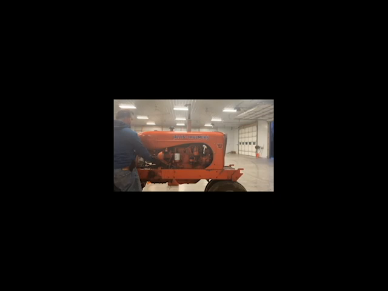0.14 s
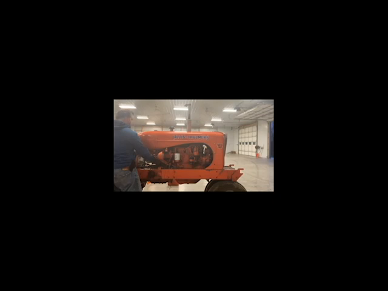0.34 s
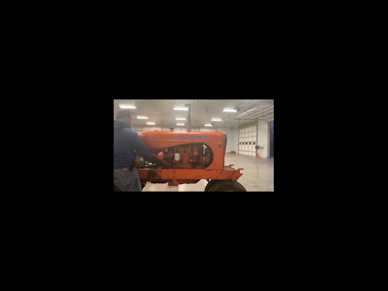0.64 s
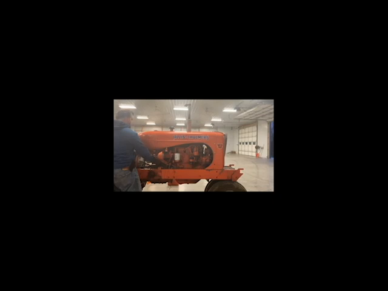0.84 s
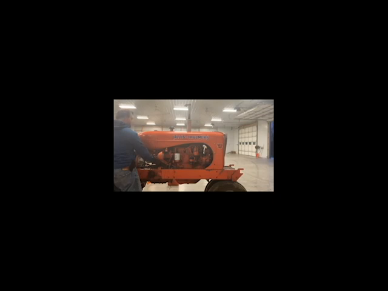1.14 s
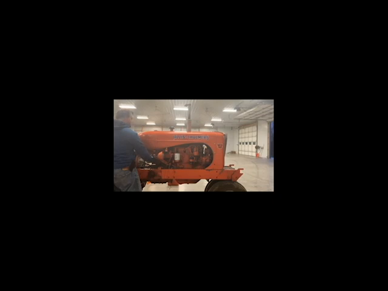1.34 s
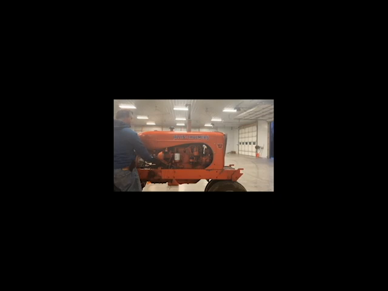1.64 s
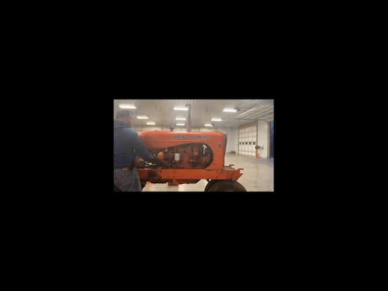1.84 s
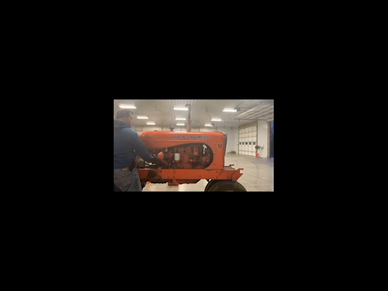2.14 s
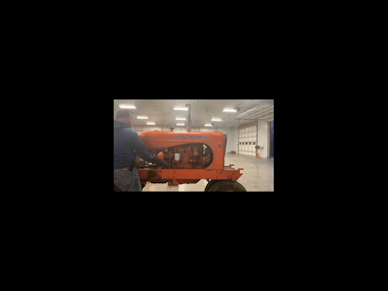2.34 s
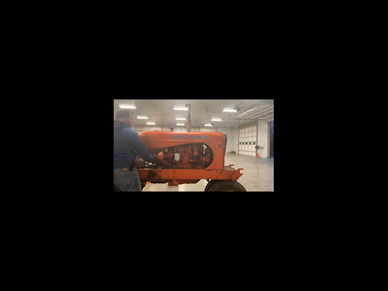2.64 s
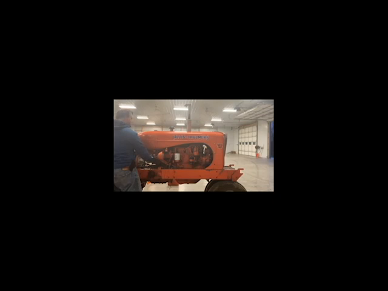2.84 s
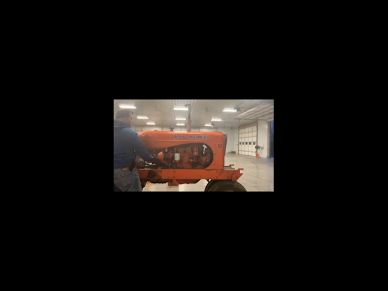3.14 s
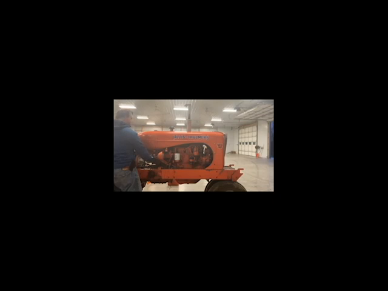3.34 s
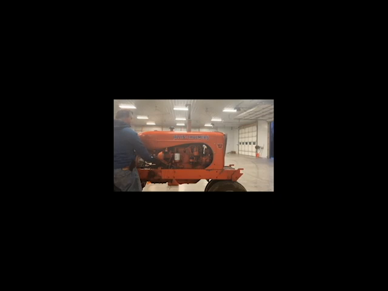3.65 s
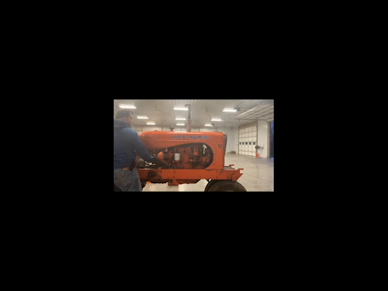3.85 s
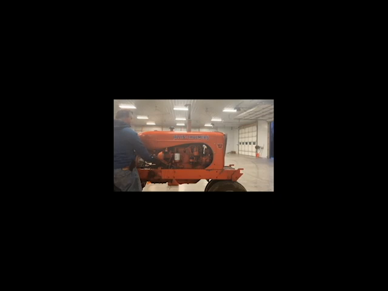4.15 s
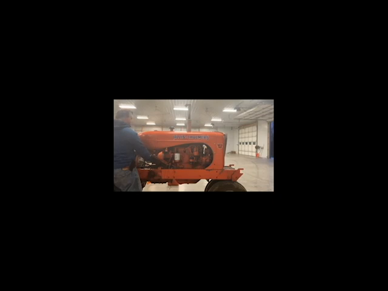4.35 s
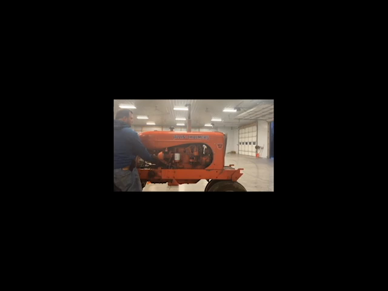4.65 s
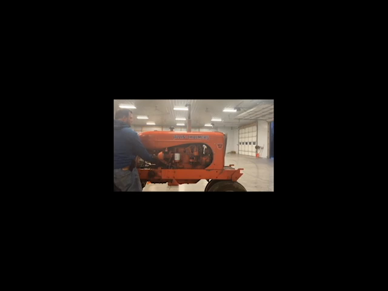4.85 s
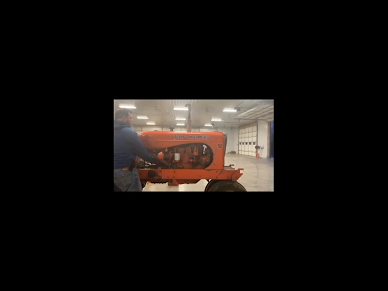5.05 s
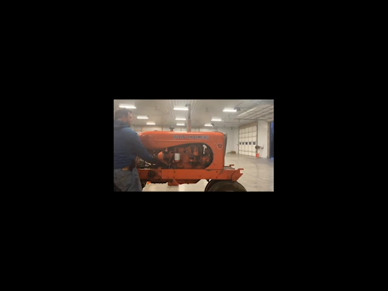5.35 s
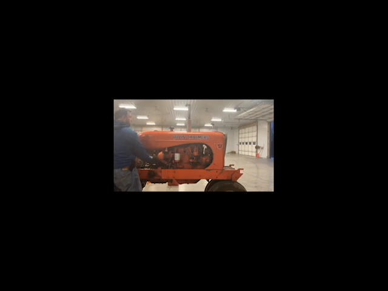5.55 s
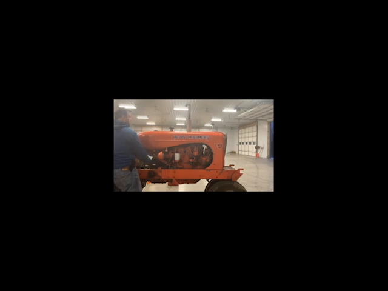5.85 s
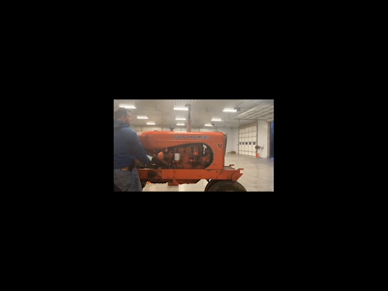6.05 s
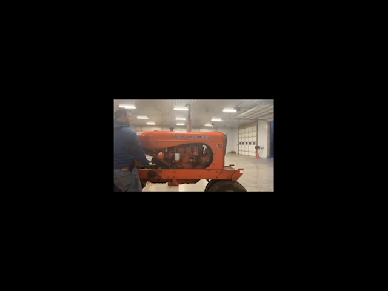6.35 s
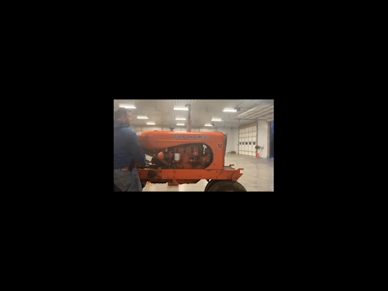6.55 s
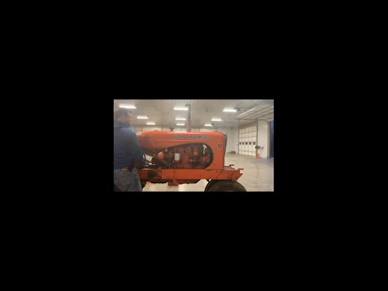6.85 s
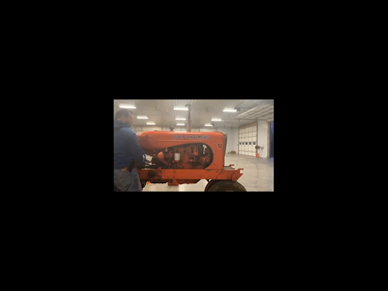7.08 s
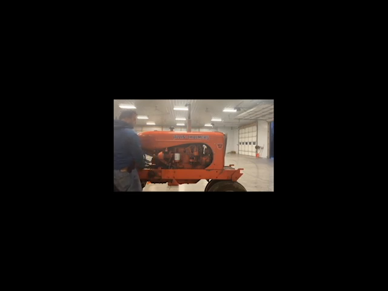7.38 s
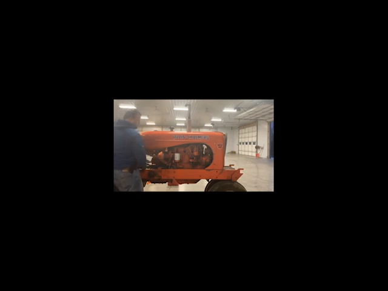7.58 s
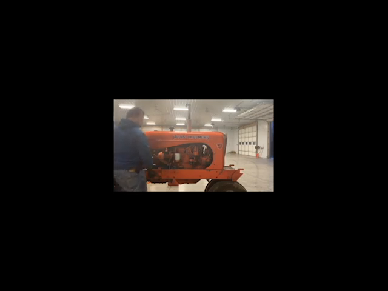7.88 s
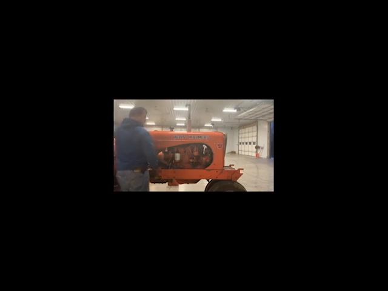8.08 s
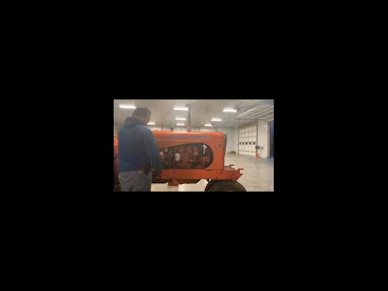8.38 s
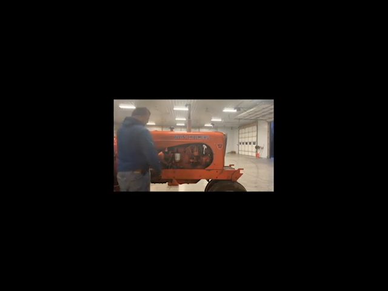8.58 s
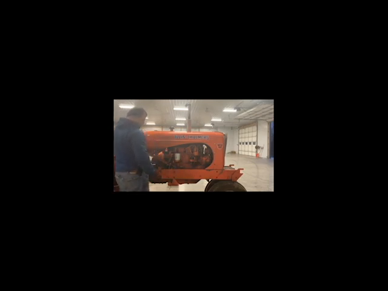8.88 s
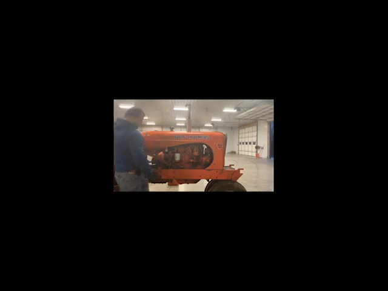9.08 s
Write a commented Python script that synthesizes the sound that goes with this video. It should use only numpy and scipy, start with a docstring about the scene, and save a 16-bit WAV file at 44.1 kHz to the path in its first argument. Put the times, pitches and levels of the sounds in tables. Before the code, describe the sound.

Faint hand knocks, a grinding, pulsing starter whine in two tries, then an old four-cylinder tractor engine fires up and settles into a spitting, clacking idle.

```python
"""Soft knocks of a hand on the controls open the scene, in the faint noise of a large workshop.
The starter of an old four-cylinder petrol tractor then clashes in and whines, a harmonic series at the
rate of tooth contact; it drags at each compression, slips out, slows and cranks again.
The engine catches, backfires and settles to a slow idle: firings excite low modes and pipe modes,
one cylinder spits bursts of noise on every cycle, and the valve gear clacks through a ringing cover."""
import sys
import numpy as np
from scipy import signal
from scipy.fft import rfft, irfft, next_fast_len
from scipy.io import wavfile

SR = 44100
rng = np.random.default_rng(int(sys.argv[2]) if len(sys.argv) > 2 else 0)


def store_wav(level_fs):
    """Save 16-bit WAV to argv[1]."""
    pcm = np.round(np.clip(np.atleast_2d(level_fs), -1, 1) * 32767)
    wavfile.write(sys.argv[1], SR, pcm.T.astype(np.int16))


N = 406602

# All levels below are relative unless they are ratios of two sounds.
# hand on the controls: (time [s], level [dB])
HANDLING = [(0.018, -38), (0.079, -46), (0.574, -45), (1.044, -46), (1.099, -35), (1.148, -30.5)]
# resonances of the control lever: (frequency [Hz], width [Hz], level [dB])
LEVER = [(950, 67, -4), (1210, 66, 3), (1300, 50, -12), (1400, 40, -7), (2150, 90, -9)]
# spectra of the tick, dull body and lever of a knock: (frequency [Hz], level [dB])
TICK_COLOUR = [(700, -20), (2000, -11), (5000, -10), (14000, -12)]
KNOCK_COLOUR = [(120, -1), (350, 4), (700, -7), (2200, -10), (4200, -13), (12000, -39.5)]
LEVER_TONE = [(1500, -2), (6000, -26)]
# steady background noise of the workshop: (frequency [Hz], level [dB])
SHOP_COLOUR = [(25, -1), (70, 2.5), (150, -8.5), (400, -14), (650, -22.5), (1400, -30), (4000, -37),
               (8000, -38), (15000, -62)]
SHOP_DB = -58.5
# workshop decay: (frequency [Hz], time to fall 60 dB [s])
HALL_DECAY = [(100, 2), (500, 1.74), (2000, 0.55), (6000, 0.48), (15000, 0.53)]
# likeness of the room sound in the two channels: (frequency [Hz], likeness [0-1])
LIKENESS = [(100, 0.9), (300, 0.96), (600, 0), (1500, 0), (4000, 0), (9000, 0.76)]
# strength of the room sound: (frequency [Hz], level [dB])
WET = [(1500, -4), (3000, -1.5), (5500, 0), (8500, -11.5)]

# starter gear speed before drag, one list per try: (time [s], speed [teeth/s])
TRIES = [
    [(1.2, 160), (1.35, 260), (1.46, 403), (1.55, 470), (1.7, 470), (1.81, 510), (1.96, 528), (2.6, 512)],
    [(2.63, 510), (2.7, 300), (2.8, 294), (2.89, 180), (3.12, 160.5), (3.25, 313), (3.38, 380), (3.49, 444),
     (3.62, 498)],
]
# load on the starter, one list per try: (time [s], gear level [dB], motor groan level [dB])
LOAD = [
    [(1.17, -34, -53), (1.206, -21.5, -15.5), (1.242, -14, -24), (1.266, -12, -8.5), (1.84, -9, -19.5),
     (2.344, -14, -15.5), (2.368, -22.5, -26), (2.49, -26.5, -25), (2.62, -33, -47)],
    [(2.65, -21, -15), (2.73, -20, -12), (3.098, -38.5, -31), (3.228, -22.5, -12.5), (3.364, -11.5, -11.5),
     (3.408, -14.5, -10.5), (3.54, -9, -22), (3.77, -10, -12.5), (3.81, -19, -21)],
]
# a piston comes up against compression and drags on the starter: (time [s], drag [0-1])
DRAGS = [(1.409, 0.32), (1.52, .25), (1.636, 0.72), (1.775, 1), (1.878, .8), (1.978, 0.48), (2.078, .9),
         (2.185, 1), (2.284, .6), (2.39, .8), (3.41, .3), (3.645, .7), (3.775, 0.68)]
# half length [s] of a drag; a full drag takes these shares of speed and clean whine, and this level
DRAG_S, DRAG_SLOWS, DRAG_QUIETS_DB, DRAG_ROUGHENS = 0.022, 0.17, 6, 0.21
# the gear only grinds when slow; when fast, up to this share of its power is clean whine
SLOW_TEETH_HZ, FAST_TEETH_HZ, CLEAN_AT_SPEED = 174, 404, 0.76
# gear load at which the teeth only skate, and at which they bear fully
SLIPPING_DB, GRIPPING_DB = -25, -15
# gear noise: (frequency [Hz], level [dB])
GEAR_COLOUR = [(200, -18), (420, -7.5), (620, -7.5), (860, -7), (1160, -1.5), (2020, -1.5), (2600, -9),
               (4000, -15), (5860, -19.5), (8320, -15.5), (11000, -21), (15700, -32)]
# resonances of the flywheel housing: (frequency [Hz], width [Hz], level [dB])
HOUSING = [(851, 30, 7), (1279, 7.1, 1), (1426, 47, -6.5), (1570, 20, -1.5), (1695, 13, 7), (1940, 14, -11),
           (2035, 46, 1), (2230, 11, -2), (2454, 18, 2)]
# resonances of the frame under the starter: (frequency [Hz], width [Hz], level [dB])
FRAME = [(163, 13.1, -2.5), (251, 24, 2), (305, 23, 6), (403, 37, 3), (455, 67, -0.5), (523, 14, 1),
         (664, 58, -6.5)]
# treble loss of the groan: (frequency [Hz], level [dB])
GROAN_TONE = [(1500, -0.5), (5000, -4), (12000, -17.5)]
# hums of the labouring starter motor: (time [s], length [s], frequency [Hz], level [dB])
HUMS = [(1.2, 0.3, 306.4, -16), (2.677, 0.037, 470, -11.5), (2.713, 0.033, 311.3, -15),
        (2.89, .17, 164.5, -21), (3.132, 0.43, 306.9, -24), (3.41, 0.0705, 309.8, -11.5)]
HUM_ATTACK_S, HUM_RELEASE_DB_PER_S = 0.013, 120
# pinion hitting the flywheel ring: (time [s], level [dB])
CLASHES = [(1.2328, 2), (2.448, -12.5), (2.6352, -3.5), (2.69, -13.5)]
# spectra of the crash and of the shudder after it: (frequency [Hz], level [dB])
CRASH_COLOUR = [(200, -7.0), (500, 8), (2000, 3.5), (3500, -7.0), (9000, -10), (15000, -16)]
SHUDDER_TONE = [(1200, 1.5), (4000, -32), (12000, -26)]
# harsh squeal after each compression: (frequency [Hz], level [dB])
SQUEAL = [(450, -1), (900, -10), (1300, -35), (1650, 4), (2050, 9), (2300, -21), (3500, -35)]
SURGE_AFTER_S, SURGE_S = 0.043, 0.035   # delay of the squeal after a compression; its half length

# cylinders puffing over compression while cranked: (time [s], level [dB])
COMPRESSIONS = [(1.528, -17), (1.778, -22), (1.979, -18), (2.18, -22), (2.38, -20), (3.55, -20),
                (3.75, -20)]
# the four cylinders: (place in the cycle [0-1], thump level [dB], puff level [dB])
CYLINDERS = [(0, 2, 4.5), (.276, 0, -17.5), (0.528, -20, -42), (.78, -2.5, -5)]
# exhaust pipe modes: (frequency [Hz], level [dB], time to fall 60 dB [s])
PIPE = [(103.2, -7, 0.45), (132, -11, 0.37), (164, -16, 0.073), (201.4, -3, 0.19), (220.5, -1, 0.092),
        (252.3, -1.5, 0.24), (301, -3.5, 0.27), (418.2, -2.5, 0.28), (523.3, -4.5, 0.45)]
# backfire: (time [s], hiss level [dB], bark level [dB], boom level [dB])
BACKFIRE = [(4.1779, 0, -5, -2)]

CATCH_S = 3.8   # the engine catches and throws the starter out of mesh
SETTLED_S = 5.68   # the valve pattern alternates from here on
# extra level at the catch and time constant of its settling
FLARE_RUMBLE_DB, FLARE_RUSTLE_DB, FLARE_S = 7, 10.5, 0.46
IDLE_RUMBLE_DB, IDLE_RUSTLE_DB = -27, -27
# spectra of the running engine: (frequency [Hz], level [dB])
RUMBLE = [(15, -36), (28, -3), (55, 3), (96, -6.5), (284, -4.5), (350, -6), (465, -3.5), (517, 0.5),
          (609, -10), (900, -32), (1170, -35), (1980, -120)]
RUSTLE = [(350, -19), (600, 1), (1700, 0), (3600, -5.5), (5500, -11), (8400, -11), (11300, -13.5),
          (15700, -24)]
# timing gear whirr: (frequency [Hz], width [Hz], level [dB])
WHIRR = [(306.7, 7.9, -8), (398, 8.5, -5.5), (493, 34, -3.5), (526.6, 7.4, 0)]
# partials of the free-spinning starter armature: (frequency [Hz], level [dB])
ARMATURE_COLOUR = [(75, -6), (160, 3), (250, 2.5), (370, -6.5), (450, 4), (510, -0.5), (570, -14),
                   (700, -19)]
# freed armature: turns per second at first and at most, rise time, time constant of the run-down
FREE_START_HZ, FREE_TOP_HZ, RACE_S, COAST_S = 65, 87, 0.28, 2.4
FREE_SWELL_S, FREE_FADE_DB_PER_S = 0.14, 14
# the loud cylinder spits at the start of each four-stroke cycle:
# (time [s], hiss level [dB], bark level [dB])
SPITS = [(3.822, 5, -12), (4.0954, 4, -12), (4.3996, 1, -15), (4.6789, 2, -15), (4.939, 0, -16.5),
         (5.1905, -2, -19), (5.438, -1, -14), (5.682, -1, -17), (5.9245, 0.5, -12.5), (6.1632, -2, -14),
         (6.4001, 2.5, -10.5), (6.6227, -1, -13), (6.8501, -1, -14.5), (7.0807, -4, -13),
         (7.3211, -4.5, -12.5), (7.5457, -1.5, -14), (7.7802, 0, -12), (8.0184, 1, -13.5), (8.2558, 1, -11),
         (8.4885, 0, -12.5), (8.7254, 1, -12.5), (8.9578, -1, -13), (9.1957, -1, -12.5)]
# spectra of the hiss, bark and low woof of a spit: (frequency [Hz], level [dB])
SPIT_COLOUR = [(1200, -47), (2000, -12), (3900, -2.5), (5200, -10), (8300, -1), (11500, -3.5), (14000, -8),
               (15700, -10)]
BARK_COLOUR = [(150, -11), (300, -12), (700, -3), (1100, -5), (1700, -3.5), (2600, -3.5), (4000, -17)]
CHUG_COLOUR = [(60, -12), (120, 2.5), (220, 3.5), (320, -7.0), (500, -12), (2000, -54)]
# valve gear clacks in every cycle:
# (place in the cycle [0-1], level [dB], extra level on every second settled cycle [dB])
VALVE_GEAR = [(.135, -18, 12.5), (.25, -19, -4), (.465, -13, 6.5), (.8, -21.5, 0.5)]
# louder stray knocks of the valve gear: (time [s], level [dB])
KNOCKS = [(4.5217, -9), (5.536, -5.5), (6.3595, -4.5), (6.803, -4), (6.975, -8), (7.2984, -4.5),
          (8.202, -9.5)]
# valve cover resonances: (frequency [Hz], width [Hz], level [dB])
COVER = [(1711, 21, -3), (2047, 27, -8.5), (2905, 86, -4.5), (3480, 98, -5), (3878, 44, -4),
         (4260, 720, -6), (7320, 57, -22), (8400, 45, -23), (8670, 60, -8.5), (9000, 70, -7)]

# lead of the right channel in the direct engine sound: (frequency [Hz], phase [rad])
ENGINE_LEAD = [(1000, 0), (3200, .9), (5000, 1), (6500, 0)]
# lag of the right channel in the whole sound: (frequency [Hz], phase [rad])
CHANNEL_PHASE = [(0, 0), (4900, 0), (6030, 2.8), (8100, 6.28), (9800, 9.42), (11400, 12.57), (13200, 15.71),
                 (14700, 18.85), (16400, 22)]
# left over right: (frequency [Hz], level difference [dB])
CHANNEL_BALANCE = [(110, 2.5), (380, 2.1), (700, 0.6), (1290, -1.2), (2380, -1.5), (4400, 0.6),
                   (8000, -0.11)]
CUTOFF_HZ = 15800


def from_db(db):
    """Amplitude ratio of a level."""
    return 10 ** (np.asarray(db) / 20)


def rms_one(x):
    """Normalises to unit effective value."""
    return x / np.sqrt(np.mean(x ** 2) + 1e-20)


def in_time(rows):
    """Linear interpolation of each column of a curve at every sample."""
    s, *columns = np.transpose(rows)
    return [np.interp(np.arange(N) / SR, s, c) for c in columns]


def at_hz(points, hz):
    """A spectrum interpolated on a log-frequency axis."""
    table_hz, value = np.array(points).T[:2]
    return np.interp(np.log(hz + 1e-9), np.log(table_hz), value)


def fade(start, end):
    """Linear ramp from 0 at start to 1 at end; falls in time if end comes first."""
    return np.clip((np.arange(N) / SR - start) / (end - start), 0, 1)


def since(start):
    """Seconds since start, 0 before it."""
    return np.maximum(np.arange(N) / SR - start, 0)


def share(x, low, high):
    """Linear ramp from 0 at low to 1 at high."""
    return np.clip((x - low) / (high - low), 0, 1)


def drift(rate):
    """Random modulation: straight lines between normal draws, rate of them per second."""
    knots = rng.standard_normal(N // 20)
    return np.interp(np.arange(N) / SR * rate, np.arange(len(knots)), knots)


def shape(x, response):
    """Linear filtering: multiplies the spectrum by a response given as a function of Hz."""
    size = next_fast_len(N + SR // 4, True)
    hz = np.arange(size // 2 + 1) * SR / size
    return irfft(rfft(x, size) * response(hz), size)[..., :N]


def equalise(x, spectrum):
    """Zero-phase filtering by a table of levels."""
    return shape(x, lambda hz: from_db(at_hz(spectrum, hz)))


def colour(x, spectrum):
    """Spectral colouring of a steady signal to unit effective value."""
    return rms_one(equalise(x, spectrum))


def noise(spectrum):
    """White noise coloured by a spectrum."""
    return colour(rng.standard_normal(N), spectrum)


def clicks(times, db):
    """Impulses of the given height, one at each time."""
    out = np.zeros(N)
    at = np.round(np.asarray(times) * SR).astype(int)
    inside = (at >= 0) & (at < N)
    out[at[inside]] = from_db(db)[inside]
    return out


def dying(x, t60):
    """Exponential decay of each click, falling 60 dB in t60 seconds."""
    return signal.lfilter([1], [1, -from_db(-60 / (t60 * SR))], x + 1e-18)


def swell(x, rise_s):
    """First-order lag that rounds the onset of an envelope."""
    r = np.exp(-1 / (rise_s * SR))
    return signal.lfilter([1 - r], [1, -r], x)


def ring(x, hz, t60):
    """Damped oscillator: a unit click sets a decaying sine of height 1 ringing."""
    r = from_db(-60 / (t60 * SR))
    w = 2 * np.pi * hz / SR
    return signal.lfilter([0, np.sin(w)], [1, -2 * r * np.cos(w), r * r], x + 1e-18)


def resonate(x, peaks):
    """Parallel resonances, each of (frequency, width, level)."""
    return sum(from_db(db) * signal.lfilter(*signal.iirpeak(hz, hz / width, fs=SR), x)
               for hz, width, db in peaks)


def partial(turn, k):
    """Harmonic k of a rotation counted in turns, with staggered phase."""
    return np.cos(2 * np.pi * k * turn + k * k)


def lagged(x, phase):
    """Interaural phase: a pair of channels in which the right lags by (frequency, radians)."""
    half = 0.5j * np.array([[1], [-1]])
    return shape(x, lambda hz: np.exp(half * np.interp(hz, *np.transpose(phase))))


def handling(level_db=-17.5, t60=0.49, tick_db=-8.0, tick_t60=0.022, lever_db=-11.0, lever_t60=0.14):
    """Impact excitation: a hand's knock gives a tick, a dull body and the resonance of the lever."""
    s, db = np.transpose(HANDLING)
    tick = noise(TICK_COLOUR) * dying(clicks(s, db + tick_db), tick_t60)
    body = noise(KNOCK_COLOUR) * dying(clicks(s, db + level_db), t60)
    lever_envelope = swell(dying(clicks(s, db + lever_db), lever_t60), 0.0079)
    lever = rms_one(resonate(rng.standard_normal(N), LEVER)) * lever_envelope
    return tick + body + equalise(lever, LEVER_TONE)


def workshop(x, build_s=0.0013):
    """Diffuse reverberation: noise tails in bands about an octave wide, longest in the bass."""
    t = np.arange(SR) / SR
    edges = np.geomspace(120, 16000, 8)
    tail = 0
    for low, high in zip(edges, edges[1:]):
        hz = np.sqrt(low * high)
        band = signal.butter(2, [low, high], "band", fs=SR, output="sos")
        mid, side = signal.sosfilt(band, rng.standard_normal((2, SR)))
        decay = from_db(-60 * t / at_hz(HALL_DECAY, hz)) * (1 - np.exp(-t / build_s))
        alike = np.clip(at_hz(LIKENESS, hz), 0, 1)
        gain = from_db(at_hz(WET, hz)) / np.sqrt(2 * np.sum(decay ** 2))
        pair = np.sqrt(1 + alike) * mid + np.sqrt(1 - alike) * side * [[1], [-1]]
        tail = tail + gain * decay * pair
    return signal.fftconvolve(x[None], tail, axes=1)[:, :N]


def bumps(delay_s, half_s):
    """Gaussian pulses, each delay_s after a compression and as high as its drag."""
    t = np.arange(N) / SR
    return sum(depth * np.exp(-0.5 * ((t - s - delay_s) / half_s) ** 2) for s, depth in DRAGS)


def cranking():
    """Compression torque slows, quiets and roughens the gear: teeth/s, pace, clean share, two levels."""
    teeth_hz, = in_time(np.vstack(TRIES))
    gear_level, groan_level = in_time(np.vstack(LOAD))
    drag = bumps(0, DRAG_S)
    pace = share(teeth_hz, SLOW_TEETH_HZ, FAST_TEETH_HZ)
    grip = share(gear_level, SLIPPING_DB, GRIPPING_DB)
    clean = np.clip(CLEAN_AT_SPEED * pace * grip * (1 - DRAG_ROUGHENS * drag), 0, 1)
    teeth_hz = teeth_hz * (1 - DRAG_SLOWS * drag)
    return teeth_hz, pace, clean, gear_level - DRAG_QUIETS_DB * drag, groan_level


def starter(wobble=0.01206, tooth_spread_db=3.5, housing_db=-4.5, gear_db=-3.5, fast_gear_db=7.5,
            groan_db=-1.0, fast_groan_db=-5.0, grind_db=4.0):
    """Gear meshing: tooth contacts give harmonics and grinding noise that excite housing and frame."""
    teeth_hz, pace, clean, gear_level, groan_level = cranking()
    turn = np.cumsum(teeth_hz * (1 + wobble * (drift(220) + drift(35)))) / SR
    series = sum(partial(turn, k) for k in range(1, 11))
    whine = rms_one(series * from_db(tooth_spread_db * drift(200)))
    tooth_beat = 1 + 0.28 * np.cos(2 * np.pi * turn)
    grind = rng.standard_normal(N) * tooth_beat * from_db(2.06 * drift(260))
    smooth = np.sqrt(clean)
    rough = np.sqrt(1 - clean) * from_db(grind_db)
    mesh = smooth * colour(whine, GEAR_COLOUR) + rough * colour(grind, GEAR_COLOUR)
    gear = rms_one(mesh + from_db(housing_db) * rms_one(resonate(mesh, HOUSING)))
    # the groan weights the whine by the clean share itself, not its root
    groan = rms_one(clean * rms_one(resonate(whine, FRAME)) + rough * rms_one(resonate(grind, FRAME)))
    groan = equalise(groan, GROAN_TONE)
    # with speed the gear gets louder and the groan fades
    gear = gear * from_db(gear_level + gear_db + fast_gear_db * pace)
    groan = groan * from_db(groan_level + groan_db + fast_groan_db * pace)
    engaged = fade(1.16, 1.19) * fade(3.88, 3.78)
    return engaged * (gear + groan)


def drone(level_db=-5.5, wobble=0.01235, waver_db=6.0, overtone_db=-25.0):
    """Frequency-modulated tones: the loaded motor's wavering hums swell, hold and die away."""
    clock = np.cumsum(1 + wobble * drift(60)) / SR
    out = 0
    for s, length, hz, db in HUMS:
        angle = 2 * np.pi * hz * clock
        hum = rms_one(np.sin(angle) + from_db(overtone_db) * np.sin(2 * angle))
        release = from_db(db - HUM_RELEASE_DB_PER_S * since(s + length))
        out = out + hum * fade(s, s + HUM_ATTACK_S) * release
    return out * from_db(level_db + waver_db * drift(24.44))


def clashes(level_db=-0.5, t60=0.11):
    """Impact and friction: the pinion slams into the ring gear, ringing the housing, then scrapes."""
    s, db = np.transpose(CLASHES)
    crash = noise(CRASH_COLOUR) * dying(clicks(s, db + level_db), t60)
    # the gears then scrape into mesh, shuddering through frame and housing
    scrape = rng.standard_normal(N)
    shaken = rms_one(resonate(scrape, FRAME) + 0.57 * resonate(scrape, HOUSING))
    shudder = shaken * swell(dying(clicks(s + 0.034, db - 8.5), 0.39), 0.026)
    return crash + 0.86 * resonate(crash, HOUSING) + equalise(shudder, SHUDDER_TONE)


def squeal(level_db=-1.5, wobble=0.0091, chatter_db=4.5):
    """Harmonics of tooth contact: a harsh chirp swells and fades just after each compression."""
    teeth_hz, _, clean, gear_level, _ = cranking()
    turn = np.cumsum(teeth_hz * (1 + wobble * drift(80))) / SR
    tone = sum(from_db(at_hz(SQUEAL, k * teeth_hz) + chatter_db * drift(60)) * partial(turn, k)
               for k in range(1, 6))
    surge = bumps(SURGE_AFTER_S, SURGE_S) * fade(3.82, 3.76)
    return from_db(gear_level + level_db) * clean * surge * tone


def in_cycles(places):
    """Periodicity of the engine: times of the given places, one row per cycle."""
    starts = np.array(SPITS)[:, 0]
    return starts[:-1, None] + np.diff(starts)[:, None] * places


def exhaust(thump_db=-15.0, thump_hz=46.6, thump_t60=0.19, pipe_db=-25.0, puff_db=-24.5, puff_t60=0.24):
    """Modal excitation: firings thump, ring the pipe modes and puff; returns (bass, rest)."""
    place, thump, puff = np.transpose(CYLINDERS)
    firings = in_cycles(place)
    s = firings.ravel()
    thump, puff = np.tile(thump, len(firings)), np.tile(puff, len(firings))
    bang_s, _, _, boom = np.transpose(BACKFIRE)
    bang = clicks(bang_s, boom)
    cranked = clicks(*np.transpose(COMPRESSIONS))
    push = clicks(s, thump + thump_db + rng.normal(0, 0.36, len(s)))
    push = push * (0.68 + 0.61 * fade(3.7, 6.8))   # the thumps grow
    bass = ring(push + 0.72 * bang + cranked, thump_hz, thump_t60)
    bass = bass + ring(0.39 * bang + 0.19 * push, 62.7, 0.28)
    pipe = 0
    for k, (hz, db, t60) in enumerate(PIPE):
        blow = clicks(s, puff + pipe_db + db + rng.normal(0, 5.2, len(s))) + 0.19 * bang
        pipe = pipe + ring(blow, hz, t60) * (-1) ** k   # neighbouring modes in opposite sign
    return bass, pipe + noise(RUSTLE) * dying(clicks(s, puff + puff_db), puff_t60)


def flare():
    """Exponential relaxation: 1 up to the catch, dying away to the idle."""
    return np.exp(-since(CATCH_S) / FLARE_S)


def running(whirr_db=-4.0, flutter_db=2.5):
    """Broadband and resonant noise of block, fan and timing gears, louder as the engine flares."""
    rumble = from_db(IDLE_RUMBLE_DB + FLARE_RUMBLE_DB * flare())
    rustle = from_db(IDLE_RUSTLE_DB + FLARE_RUSTLE_DB * flare() + flutter_db * drift(120))
    whirr = from_db(whirr_db) * rms_one(resonate(rng.standard_normal(N), WHIRR))
    whirr = whirr * (0.29 + 0.78 * fade(5.49, SETTLED_S))
    return (rumble * (noise(RUMBLE) + whirr) + rustle * noise(RUSTLE)) * fade(3.78, 3.84)


def armature(level_db=-13.5, wobble=0.0029):
    """Harmonics of rotation: out of mesh, the starter motor races, then coasts down exponentially."""
    racing = np.sin(np.pi / 2 * fade(CATCH_S, CATCH_S + RACE_S))
    coasting = np.exp(-since(CATCH_S + RACE_S) / COAST_S)
    turns_hz = (FREE_START_HZ + (FREE_TOP_HZ - FREE_START_HZ) * racing) * coasting
    turn = np.cumsum(turns_hz * (1 + wobble * drift(30))) / SR
    hum = sum(from_db(at_hz(ARMATURE_COLOUR, k * turns_hz) + 2.4 * drift(5.4)) * partial(turn, k)
              for k in range(1, 10))
    level = from_db(level_db - FREE_FADE_DB_PER_S * since(CATCH_S))
    return level * rms_one(hum) * fade(CATCH_S, CATCH_S + FREE_SWELL_S)


def bursts():
    """Exhaust discharges, spits and backfire together: times, hiss levels, bark levels."""
    return np.vstack([SPITS, np.array(BACKFIRE)[:, :3]]).T


def spits(hiss_db=-1.0, hiss_t60=0.058, bark_t60=0.22, rise_s=0.0065, bark_rise_s=0.0037,
          lead_s=0.0041, crackle_db=0.5, flare_db=-0.5):
    """Jet noise: hot gas bursts out as the valve opens, a crackling hiss over a slower bark."""
    s, peak, bark = bursts()
    start = s - lead_s   # leaves room for the rounded onset
    hiss = noise(SPIT_COLOUR) * swell(dying(clicks(start, peak + hiss_db), hiss_t60), rise_s)
    body = noise(BARK_COLOUR) * swell(dying(clicks(start, bark), bark_t60), bark_rise_s)
    return (hiss + body) * from_db(crackle_db * drift(400) + flare_db * flare())


def chugs(level_db=-2.0, t60=0.21, rise_s=0.0066):
    """Low-frequency discharge: the slug of gas behind each spit leaves the pipe as a woof."""
    s, _, bark = bursts()
    return noise(CHUG_COLOUR) * swell(dying(clicks(s, bark + level_db), t60), rise_s)


def clacks(uneven_db=3.5):
    """Periodic impacts of the valve gear, alternating once settled, and stray knocks: times, levels."""
    place, db, extra = np.transpose(VALVE_GEAR)
    s = in_cycles(place)
    second = (np.arange(len(s)) % 2 == 0)[:, None] & (s > SETTLED_S)
    db = db + extra * second + uneven_db * rng.standard_normal(s.shape)
    return np.vstack([np.column_stack([s.ravel(), db.ravel()]), KNOCKS]).T


def valves(tick_db=-7.5, tick_t60=0.1, ring_db=-23.0, shaken_db=-21.0, ring_t60=0.22, spread_db=7.5):
    """Forced resonance: clacks rattle and buzz the cover in a varying mix; the spits shake it too."""
    s, db = clacks()
    spit_s, spit_db, _ = bursts()
    rattle = noise(SPIT_COLOUR) * dying(clicks(s, db + tick_db), tick_t60)
    blows = clicks(s, db + ring_db) + clicks(spit_s, spit_db + shaken_db)
    for hz, width, level in COVER:
        buzz = rms_one(resonate(rng.standard_normal(N), [(hz, width, 0)]))
        rattle = rattle + buzz * dying(blows * from_db(level + spread_db * drift(30)), ring_t60)
    return rattle


def scene():
    """Superposition of direct sound, reverberation and the background noise of the workshop."""
    bass, pipe = exhaust()
    crank = starter() + clashes() + handling()
    engine = pipe + spits() + chugs() + valves() + running()
    hums, chirps = armature() + drone(), squeal()
    # swapping the channels makes the right one lead
    direct_engine = lagged(engine, ENGINE_LEAD)[::-1]
    near = from_db(-1.0) * crank + chirps + hums + bass + direct_engine
    room = workshop(crank + 0.24 * chirps + 0.5 * hums + engine)
    return near + room + from_db(SHOP_DB) * noise(SHOP_COLOUR)


def record(dry, low_cut_hz=35.0):
    """Phase and level differences of the channels, then low cut, soft saturation and high cut."""
    half = 0.5 * np.array([[1], [-1]])
    x = shape(lagged(dry, CHANNEL_PHASE), lambda hz: from_db(half * at_hz(CHANNEL_BALANCE, hz)))
    x = signal.sosfilt(signal.butter(6, low_cut_hz, "high", fs=SR, output="sos"), x)
    x = x / (1 + x ** 12) ** (1 / 12)
    return signal.sosfilt(signal.ellip(10, 0.1, 70, CUTOFF_HZ, fs=SR, output="sos"), x)


dry = scene()
out = record(dry)
store_wav(out)
```